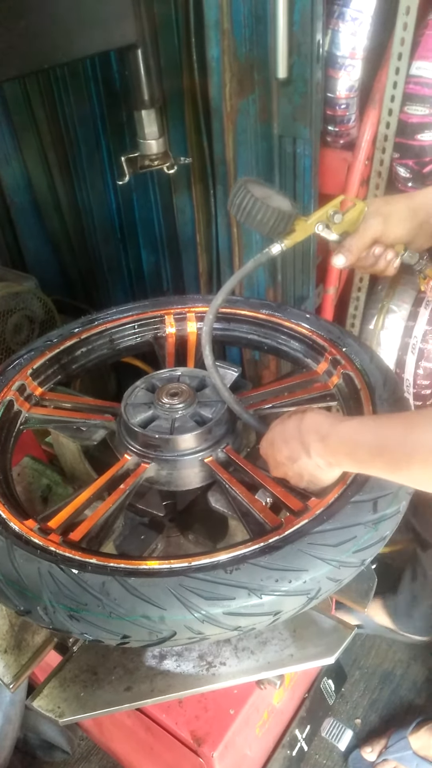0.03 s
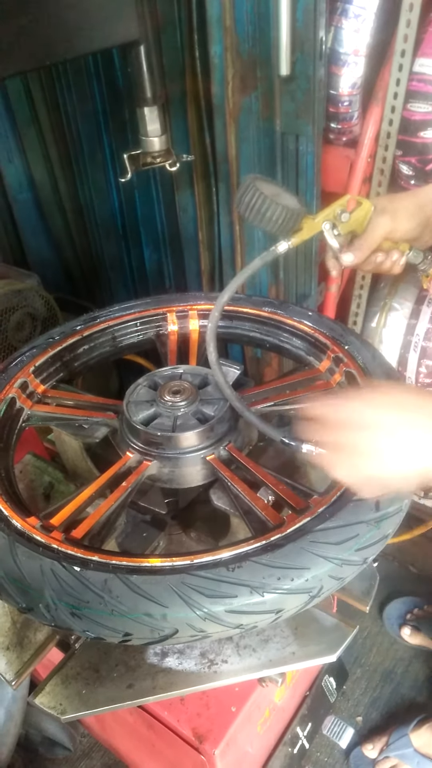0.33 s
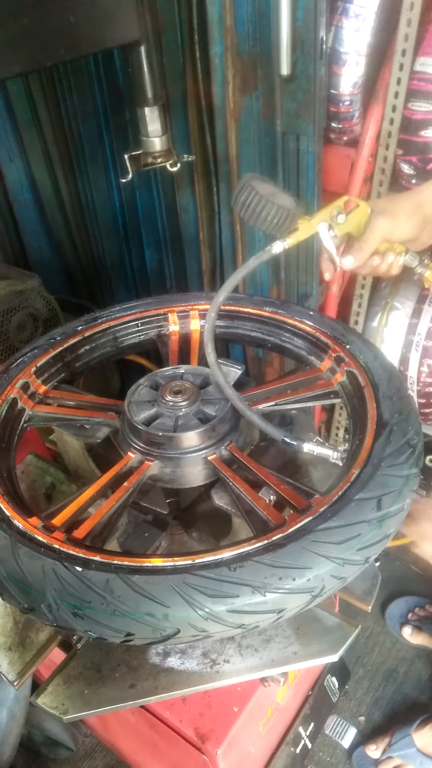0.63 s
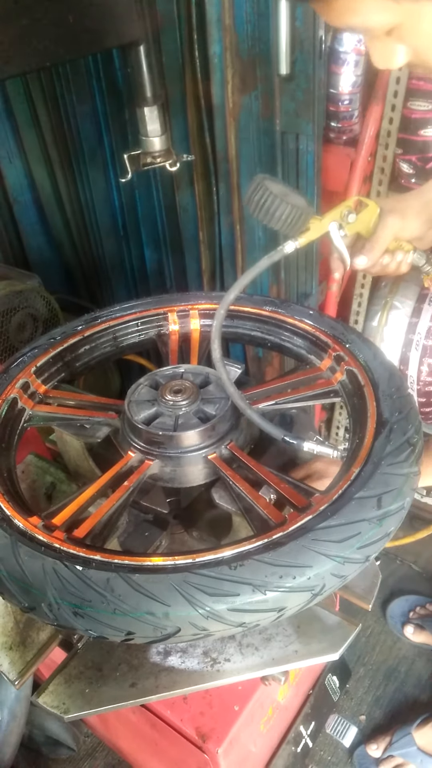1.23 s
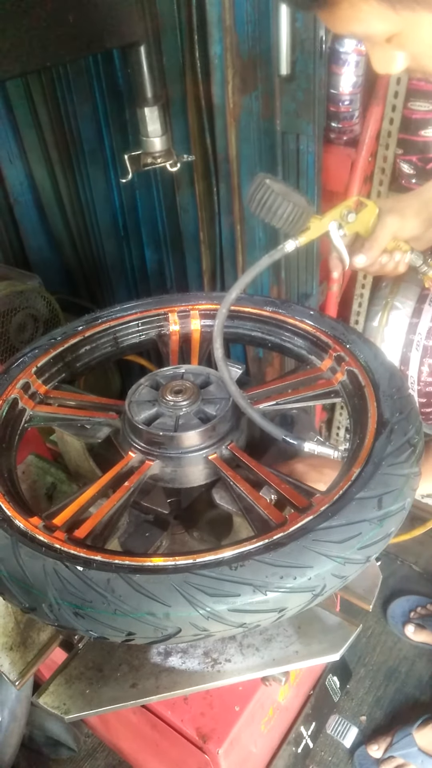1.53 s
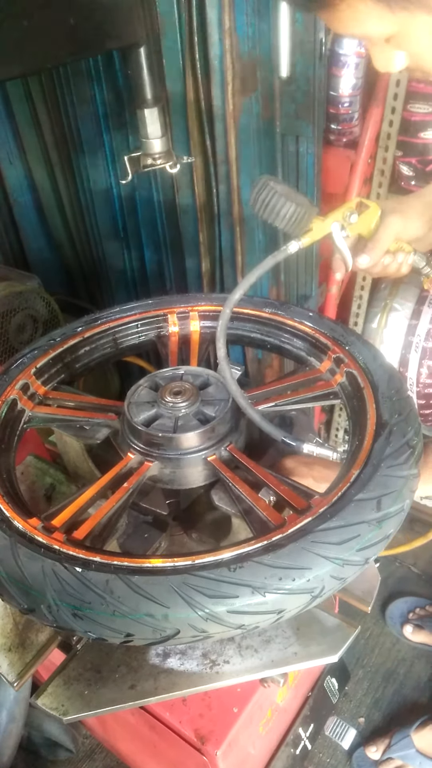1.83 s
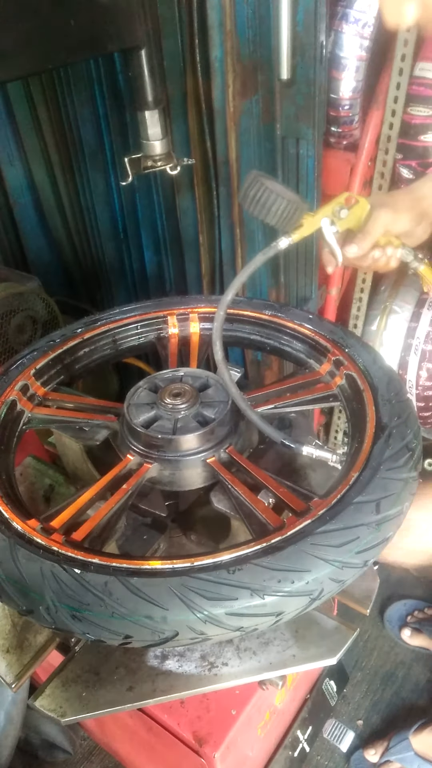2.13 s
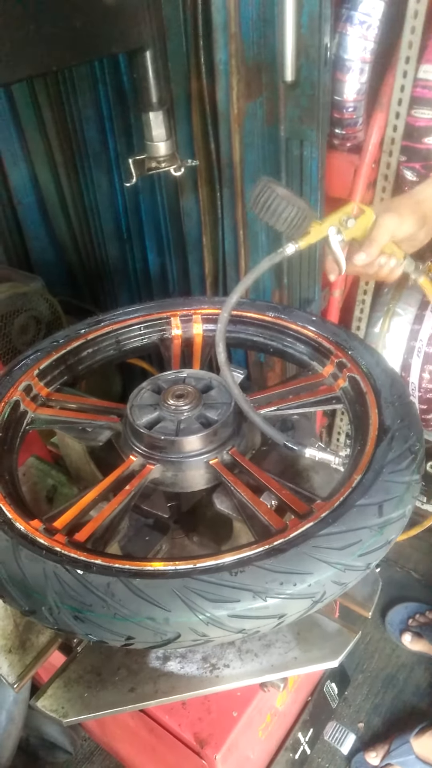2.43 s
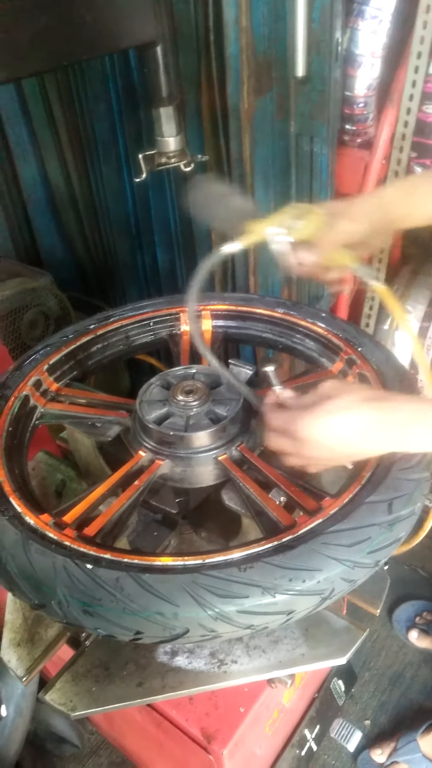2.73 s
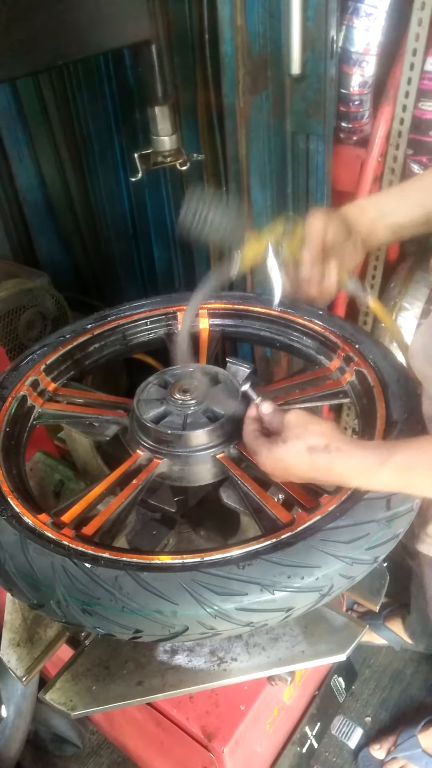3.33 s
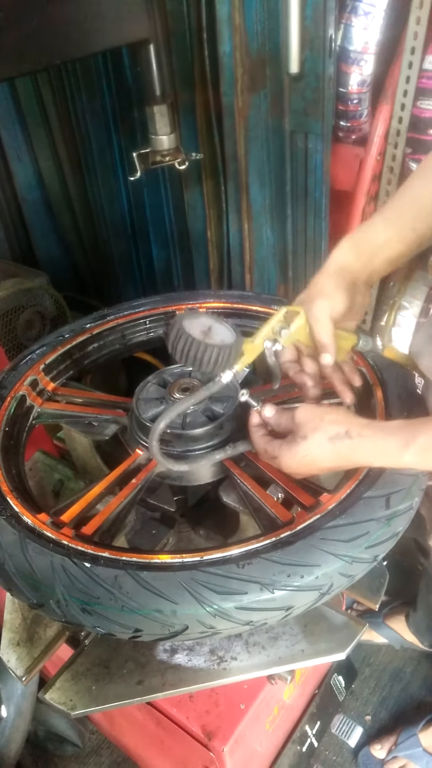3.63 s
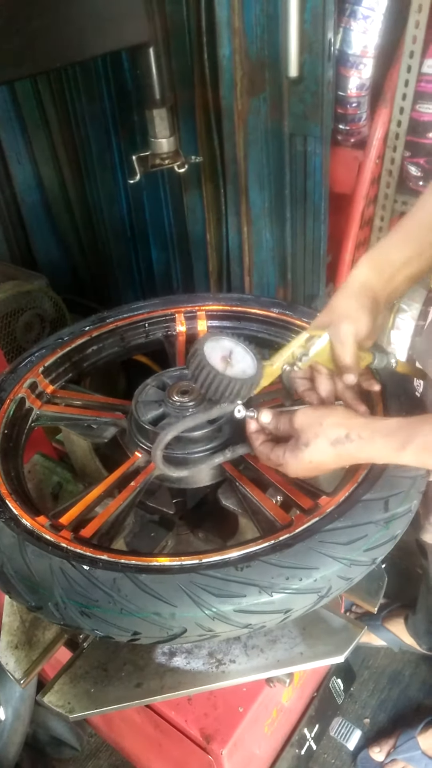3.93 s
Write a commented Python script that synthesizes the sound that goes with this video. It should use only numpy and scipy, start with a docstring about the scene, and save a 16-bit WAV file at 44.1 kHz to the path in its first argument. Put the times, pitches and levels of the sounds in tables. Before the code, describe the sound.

One sharp, close pop comes from a tyre snapping onto its wheel in a workshop. The inflating tyre first hums faintly over far traffic and an unevenly chugging machine, then pops near the end and rings low briefly.

```python
"""Tyre bead seating.

A tyre being inflated in a workshop hums faintly, higher as the pressure grows, then snaps onto its rim.
The bead slips twice under 1 ms apart and once more, softly. Each slip is a pressure pulse that thumps
the tyre and pings the rim, close to a small microphone that cuts the deep bass. The hose bumps softly;
far off a machine chugs unevenly over traffic rumble. The recorder distorts briefly on the pop,
and its coarse quantisation adds a fine hiss."""
import sys
import numpy as np
from scipy import signal
from scipy.fft import rfft, irfft
from scipy.io import wavfile

SR = 44100
rng = np.random.default_rng(int(sys.argv[2]) if len(sys.argv) > 2 else 0)


def dump(signal):
    """Clip the signal to [-1, 1] and save it as 16-bit WAV at the path in sys.argv[1]."""
    limited = np.clip(np.atleast_2d(signal).T, -1, 1)
    pcm = np.round(limited * 32767).astype(np.int16)
    wavfile.write(sys.argv[1], SR, pcm)


N = 176400
T = np.arange(N) / SR

# workshop air spectrum: f/Hz, level/dB
AIR_SPECTRUM = [(100, 0), (700, -2.5), (1200, 0), (2500, -7), (6000, -15), (14000, -28)]
# traffic spectrum: f/Hz, level/dB
TRAFFIC_SPECTRUM = [(25, -18), (60, -2), (110, 3), (150, -5.5), (275, 0), (340, -19), (520, -15),
                    (680, -25.5), (1200, -22), (2500, -32), (8000, -43.5)]
# traffic envelope: t/s, level/dB
TRAFFIC_LEVELS = [(0, -80.5), (.45, -79), (.7, -73.5), (1.1, -75), (1.6, -71), (2.45, -70), (2.7, -67),
                  (3.15, -66), (3.35, -71), (4, -72.5)]
# machine chugs: t/s, level/dB
MACHINE_CHUGS = [(0.013, -63), (.17, -67.5), (0.324, -60.5), (0.466, -60.5), (.565, -67.5), (.635, -68),
                 (.70, -63), (0.784, -59), (.933, -60), (1.083, -60.5), (1.244, -58.5), (1.32, -62.5),
                 (1.387, -59.5), (1.476, -65.5), (1.624, -63), (1.701, -63), (1.78, -63), (1.848, -67.5),
                 (1.93, -60.5), (2.087, -59), (2.408, -61.5), (2.55, -61), (2.69, -59), (2.921, -58.5),
                 (3.22, -60), (3.29, -66), (3.54, -62), (3.625, -63.5), (3.69, -66), (3.92, -64)]
# chug spectrum: f/Hz, level/dB
CHUG_SPECTRUM = [(25, -24), (55, -5), (105, 3), (160, -9), (205, -4), (280, -4), (345, -26), (430, -25),
                 (525, -19), (680, -33.5), (1200, -28.5), (2500, -39.5), (8000, -52)]
# hose and wheel bumps: t/s, level/dB
HANDLING_BUMPS = [(0.471, -60), (.745, -59), (2.104, -63), (2.549, -50), (2.70, -60.5)]
# room tail spectrum: f/Hz, level/dB
TAIL_SPECTRUM = [(100, -1), (400, -6), (1100, -8.5), (3000, -20.5), (6000, -25), (14000, -39)]
# tyre resonance: t/s, f/Hz, level/dB
HUM_TRACK = [(.6, 145.3, -88.5), (.9, 151, -79), (1.4, 159, -79), (1.7, 164, -75), (2.2, 173, -69),
             (2.6, 176.9, -67), (3.15, 176.5, -65), (3.3, 174.9, -72), (4, 173.7, -74)]
# recorder distortion partials: f/Hz, level/dB re excess swing
DISTORTION_PARTIALS = [(6050, -27), (12000, -28.5)]
# rim modes: f/Hz, level/dB re ping, t60/s
RIM_MODES = [(3950, -22, .018), (9350, -17.7, .00157)]
# bead slips: t/s, level/dB, pressure fall/ms, snap/dB, wall/dB, ping/dB (last three re pulse)
BEAD_SLIPS = [(2.987028, -11.3, 2.34, 2.1, 5.6, 1.3), (2.987703, 3.4, .596, -13.2, -3, -4.6),
              (3.040877, -17.2, .584, -6.2, -14.2, -5.5)]
POP_S = BEAD_SLIPS[0][0]


def undb(db):
    """Decibels to gain."""
    return 10 ** (np.asarray(db) / 20)


def curve(rows, column=1):
    """Table column, linearly interpolated over time."""
    rows = np.array(rows)
    return np.interp(T, rows[:, 0], rows[:, column])


def noise(spectrum):
    """Unit-rms noise shaped by (f/Hz, level/dB) points."""
    hz, db = np.array(spectrum).T
    bins_hz = np.maximum(np.fft.rfftfreq(N, 1 / SR), 1)
    gain = undb(np.interp(np.log(bins_hz), np.log(hz), db))
    shaped = irfft(rfft(rng.standard_normal(N)) * gain, N)
    return shaped / shaped.std()


def drift(rate_hz):
    """Smooth random drift, unit deviation, about rate_hz changes a second."""
    bins_hz = np.fft.rfftfreq(N, 1 / SR)
    smooth = irfft(rfft(rng.standard_normal(N)) * np.exp(-(2 * bins_hz / rate_hz) ** 2), N)
    return smooth / smooth.std()


def ring(start_s, hz, t60_s):
    """Damped mode struck at start_s."""
    age_s = np.maximum(T - start_s, 0)
    return np.sin(2 * np.pi * hz * age_s) * np.exp(-np.minimum(np.log(1000) * age_s / t60_s, 50))


def workshop_air(level_db=-88):
    """Steady room noise."""
    return undb(level_db) * noise(AIR_SPECTRUM)


def traffic(flutter_db=4.5):
    """Street rumble with a fluttering level."""
    rumble = noise(TRAFFIC_SPECTRUM)
    flutter = np.clip(drift(rate_hz=50), -2, 1.5)
    return rumble * undb(curve(TRAFFIC_LEVELS) + flutter_db * flutter)


def machine(attack_s=.006, hold_s=.018, fall_s=.014):
    """Dull, uneven puffs of a distant machine."""
    envelope = np.zeros(N)
    for start_s, db in MACHINE_CHUGS:
        attack = np.clip((T - start_s) / attack_s, 0, 1)
        decay = np.exp(-np.clip(T - start_s - hold_s, 0, .5) / fall_s)
        envelope += undb(db) * attack * decay
    return envelope * noise(CHUG_SPECTRUM)


def handling():
    """Soft, low bumps of the handled hose and wheel."""
    return sum(undb(db) * ring(start_s, hz=65.2, t60_s=.14) for start_s, db in HANDLING_BUMPS)


def room_tail(level_db=-54, t60_s=.22):
    """Short, faint workshop reverberation after the pop."""
    age_s = T - POP_S
    envelope = (age_s > 0) * undb(level_db - 60 * np.clip(age_s, 0, 1) / t60_s)
    return envelope * noise(TAIL_SPECTRUM)


def tyre_hum(waver_db=2.5, ring_db=-43.5):
    """Tyre resonance: climbs with pressure, rings on after the pop."""
    hz = curve(HUM_TRACK) * (1 + .006 * drift(rate_hz=15))
    level_db = curve(HUM_TRACK, column=2) + waver_db * drift(rate_hz=22)
    hum = undb(level_db) * np.sin(2 * np.pi * np.cumsum(hz) / SR)
    return hum + undb(ring_db) * ring(POP_S, hz=177.4, t60_s=.55)


def peak_distortion(swing, threshold=.34):
    """Brief high fizz of recorder distortion on the pop's loudest swings."""
    excess = np.maximum(np.abs(swing) - threshold, 0)
    return excess * sum(undb(db) * np.sin(2 * np.pi * hz * T) for hz, db in DISTORTION_PARTIALS)


def mic_bass_cut(pressure, hz=51.3, q=1.35):
    """Small microphone: two identical resonant high-passes."""
    omega = 2 * np.pi * hz
    b, a = signal.bilinear([1, 0, 0], [1, omega / q, omega ** 2], SR)
    return signal.lfilter(b, a, signal.lfilter(b, a, pressure))


def bead_slips(rise_ms=.396, snap_delay_ms=.205, snap_width_ms=.039):
    """Per slip: a steep, leaking pressure step swings the tyre wall; a sharp snap pings the rim."""
    pressure = np.zeros(N)
    for start_s, db, fall_ms, snap_db, wall_db, ping_db in BEAD_SLIPS:
        since_ms = (T - start_s) * 1000
        age_ms = np.clip(since_ms, 0, 100)
        snap_s = start_s + snap_delay_ms / 1000
        pulse = (1 - np.exp(-age_ms / rise_ms)) * np.exp(-age_ms / fall_ms)
        snap = undb(snap_db) * np.exp(-np.minimum(np.abs(since_ms - snap_delay_ms) / snap_width_ms, 20))
        wall = undb(wall_db) * ring(start_s, hz=65.5, t60_s=.0147)
        ping = sum(undb(mode_db + ping_db) * ring(snap_s, hz, t60_s) for hz, mode_db, t60_s in RIM_MODES)
        pressure += undb(db) * (pulse + snap + wall - ping)
    return pressure


def scene():
    """Close pop and tyre hum over quiet surroundings, mono."""
    pop = mic_bass_cut(bead_slips())
    foreground = pop + peak_distortion(pop) + room_tail() + tyre_hum()
    background = machine() + handling() + traffic() + workshop_air()
    return (foreground + background)[None]


def record(dry):
    """Recorder: coarse quantisation roughens quiet sound; low-passes soften the treble and cut the top."""
    step_db, treble_hz, top_hz = -71.5, 11000, 14500
    step = undb(step_db)
    quantised = step * np.floor(dry / step)
    softened = signal.sosfilt(signal.butter(2, treble_hz, fs=SR, output="sos"), quantised)
    return signal.sosfilt(signal.ellip(8, .2, 70, top_hz, fs=SR, output="sos"), softened)


dry = scene()
out = record(dry)
dump(out)
```